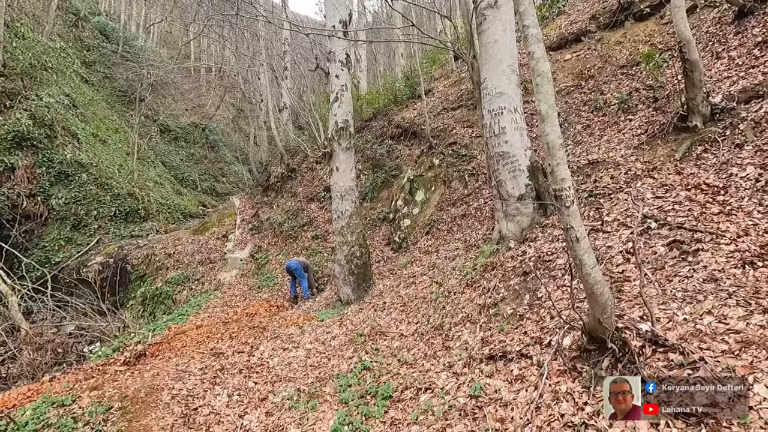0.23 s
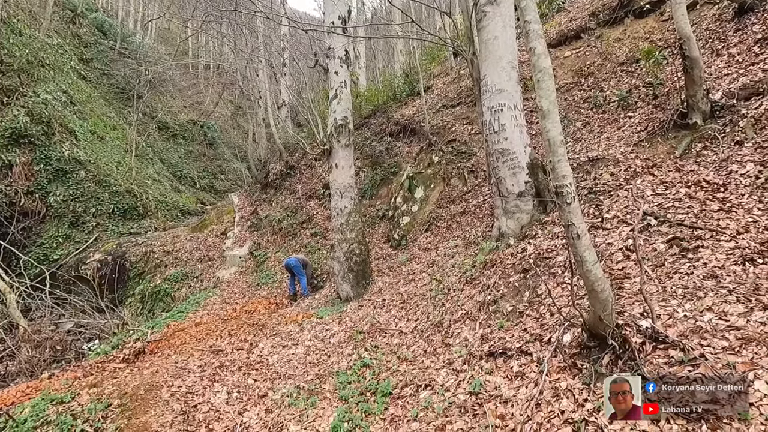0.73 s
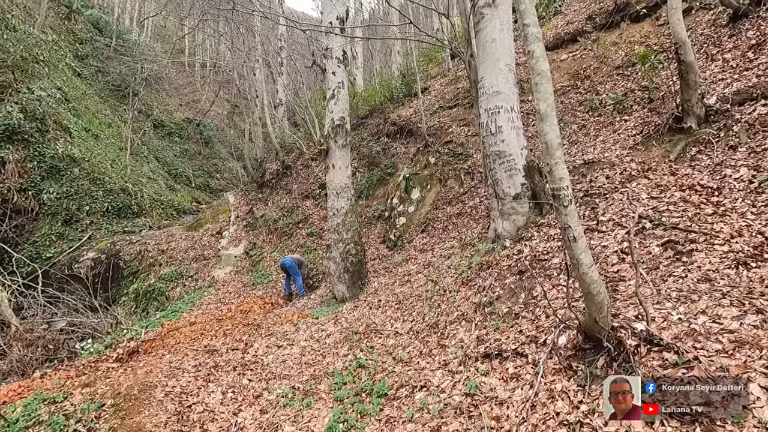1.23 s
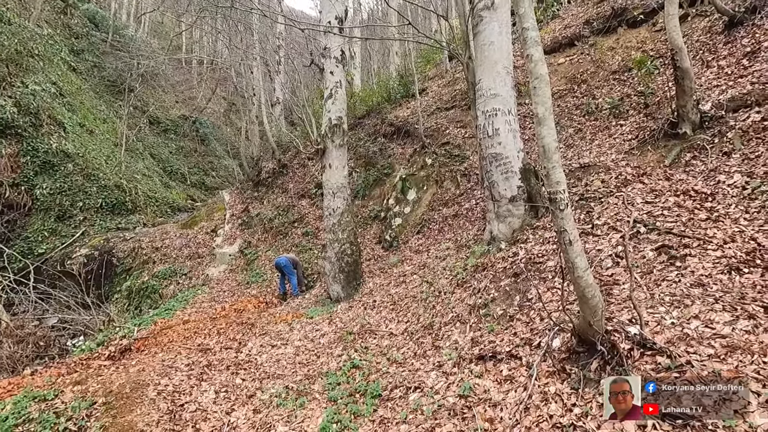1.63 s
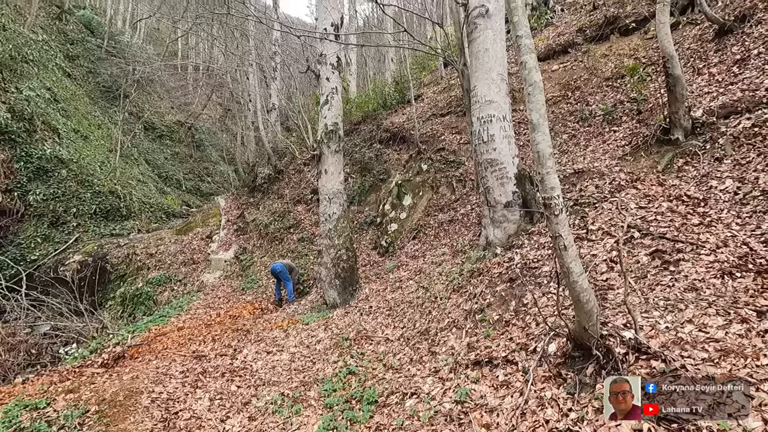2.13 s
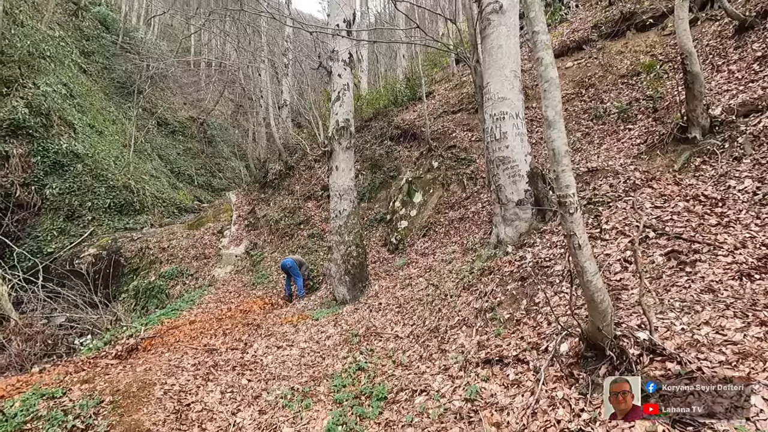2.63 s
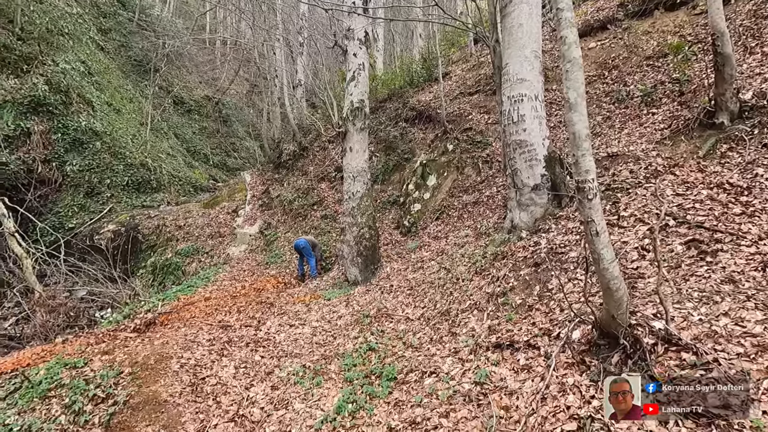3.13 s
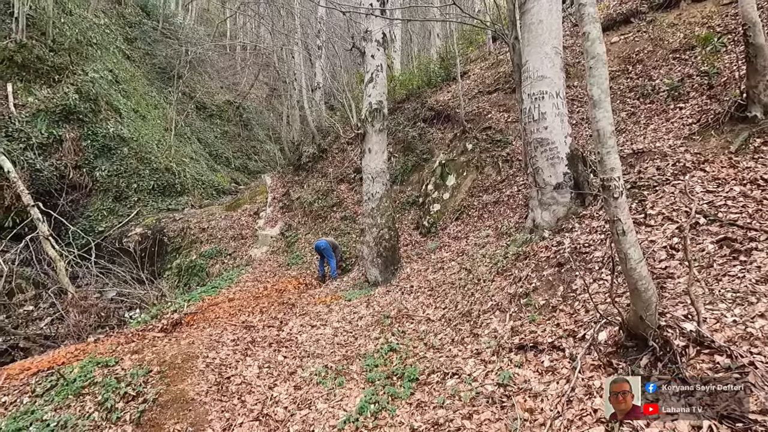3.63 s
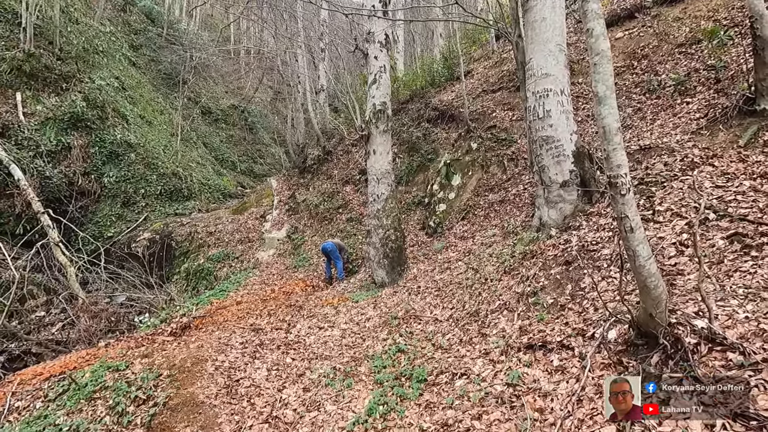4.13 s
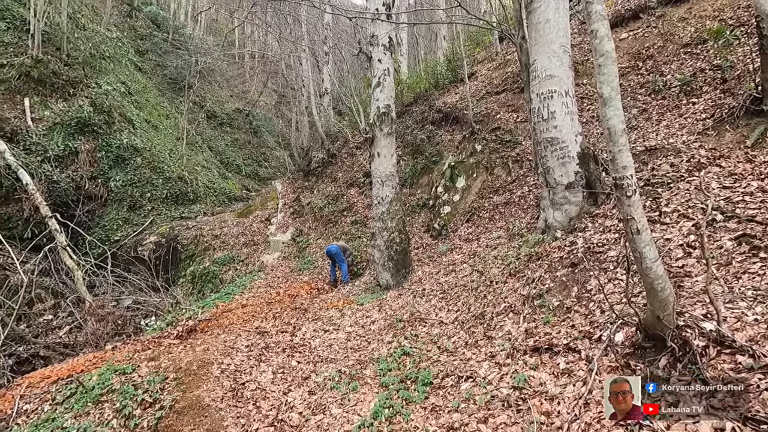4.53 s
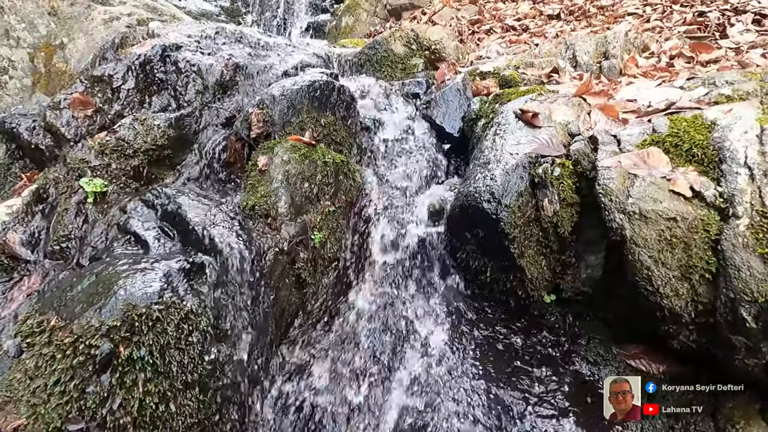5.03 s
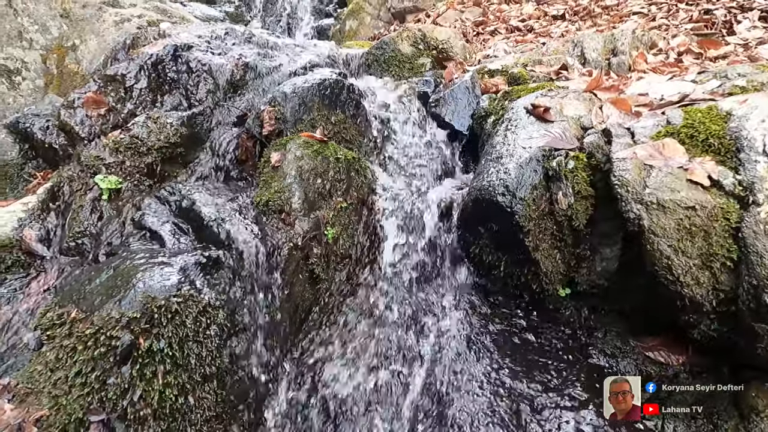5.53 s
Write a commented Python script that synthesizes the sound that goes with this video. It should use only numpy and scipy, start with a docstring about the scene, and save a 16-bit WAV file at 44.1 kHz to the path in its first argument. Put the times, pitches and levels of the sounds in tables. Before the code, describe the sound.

A quiet wooded ravine opens the sound: a stream purls softly some distance away, a steady wash with faint bubbling. Wind brushes the microphone in low, uneven puffs and rushes, strongest from about 1.2 to 3.2 seconds, with a little airy hiss near 1.5 and 2.3-2.8. Twigs crack at about 0.1, 0.4, 1.7, 2.8, 3.1 and 3.3 seconds, with a slight woodland echo; dry leaves tick faintly, mostly after 2. A bird gives thin, gliding high whistles between 2.6 and 3.1. The loudest, sharpest twig snap comes at 4.5. At about 4.87 the ravine cuts off, leaving roughly 0.2 seconds of silence. From 5.06 a small cascade fades in quickly, close and far louder: dense splashing, bubbles and bright spray surge over rocks, with low churning, hollow gulps and sharp water slaps, strongest around 5.2 and 5.6, continuing to the end. Both channels are identical.

```python
"""A wooded ravine: a stream purls some way off, wind brushes the microphone, twigs crack, leaves tick, a bird calls.
The sound cuts out, then fades in beside a small cascade: splashes, bubbles, slaps, hollow gulps between rocks.
Water is summed ringing bubbles plus noise; wind is shaped noise under gust envelopes; twigs are decaying modes;
leaves and slaps are noise bursts; bird notes and gulps are gliding sines. Both channels are alike."""
import sys
import numpy as np
from scipy import signal
from scipy.fft import rfft, irfft, next_fast_len
from scipy.io import wavfile
from scipy.ndimage import map_coordinates

SR = 44100
rng = np.random.default_rng(int(sys.argv[2]) if len(sys.argv) > 2 else 0)


def master_out(mix):
    """Clip the mix to full scale and print it as 16-bit PCM to the path in sys.argv[1]."""
    frames = np.transpose(np.atleast_2d(mix))
    ceiling = np.clip(frames, -1, 1)
    pcm = np.round(ceiling * 32767).astype(np.int16)
    wavfile.write(sys.argv[1], SR, pcm)


N = 254456

CUT_S, FADE_START_S, FADE_END_S = 4.868, 5.063, 5.135


def amp(db):
    """Decibels to gain."""
    return 10 ** (np.asarray(db) / 20)


def unit(x):
    """Scale x to rms 1."""
    return x / np.sqrt(np.mean(x ** 2) + 1e-20)


def clock():
    """Time of each sample, s."""
    return np.arange(N) / SR


def curve(rows):
    """Interpolate (t/s, value) rows to one value per sample."""
    t_s, value = np.transpose(rows)
    return np.interp(clock(), t_s, value)


def wobble(rate_hz):
    """Smooth random curve with rate_hz knots a second."""
    knots = rng.standard_normal(int(N * rate_hz / SR) + 4)
    return map_coordinates(knots, [clock() * rate_hz])


def envelope(top_s, attack_s, hold_s, release_s):
    """Gain that swells to 1 at top_s, holds, then dies away."""
    t = clock()
    swell = 1 + (t - top_s) / attack_s
    decay = 1 - (t - top_s - hold_s) / release_s
    return np.clip(np.minimum(swell, decay), 0, 1) ** 1.5


def filtered(x, response):
    """Apply a frequency response to x, zero-padded."""
    size = next_fast_len(N + SR // 2)
    spectrum = rfft(x, size) * response(np.fft.rfftfreq(size, 1 / SR))
    return irfft(spectrum, size)[..., :N]


def colour_gain(hz, colour):
    """Gain of an (f/Hz, level/dB) colour, interpolated over log frequency."""
    f_hz, level_db = np.transpose(colour)
    return amp(np.interp(np.log(hz + 1), np.log(f_hz), level_db))


def shaped(x, colour):
    """Filter x by a colour."""
    return filtered(x, lambda hz: colour_gain(hz, colour))


def noise(colour):
    """Gaussian noise of that colour, rms 1."""
    return unit(shaped(rng.standard_normal(N), colour))


def add(track, start_s, sound):
    """Mix a short sound into the track."""
    part = track[round(start_s * SR):][:len(sound)]
    part += sound[:len(part)]


def bubbles(from_s, rate_hz, low_hz, high_hz, cycles, spread_db, rise, size):
    """Bubbles ring as decaying sines, rising in pitch as they surface; rms 1 from from_s on."""
    span_s = N / SR - from_s
    start, pitch, life, strength, sign = rng.random((int(rate_hz * span_s), 5)).T[:, :, None]
    hz = low_hz * (high_hz / low_hz) ** pitch
    tau_s = cycles * (.5 + life) / hz / np.pi
    t = np.arange(size) / SR
    # gain in proportion to hz evens out the summed spectrum
    gain = amp(-spread_db * np.log(strength + .01)) * hz * np.sign(sign - .5)
    glide = 1 + rise * t / (t + 4 * tau_s)
    decay = np.exp(-t / tau_s) * (1 - np.exp(-2 * hz * t))
    ring = gain * decay * np.sin(2 * np.pi * hz * glide * t)
    at = ((from_s + start * span_s) * SR).astype(int) + np.arange(size)
    mix = np.bincount(at.ravel(), ring.ravel(), N)[:N]
    return unit(mix) * np.sqrt(span_s * SR / N)


def bursts(rows, t60_s, colour):
    """Short decaying noise bursts of one colour, each at its own peak level."""
    out, t = np.zeros(N), np.arange(SR // 20) / SR
    gain = colour_gain(np.fft.rfftfreq(len(t), 1 / SR), colour)
    lead_s = .001  # room ahead of the onset for the filter's spread
    for start_s, peak_db in rows:
        puff = rng.standard_normal(len(t)) * amp(-60 * t / t60_s) * (1 - np.exp(-2000 * t))
        burst = irfft(rfft(np.roll(puff, SR // 1000)) * gain)
        add(out, start_s - lead_s, amp(peak_db) * burst / np.abs(burst).max())
    return out


# stream spectrum: f/Hz, relative level/dB
BROOK_COLOUR_HZ_DB = [(180, -33.5), (300, -4.5), (387, -6), (462, -8), (577, -3.5), (733, -12.5), (860, -8),
                      (947, -12.5), (2280, -10), (3730, -12.5), (5740, -18.5), (7070, -26.5), (8980, -41.5),
                      (10900, -38.5), (13600, -68)]
BROOK_DB = -40


def brook():
    """Far water: distance blends most bubbles into a wash of noise, a few still stand out."""
    purl = bubbles(from_s=0, rate_hz=600, low_hz=583.6, high_hz=4050, cycles=18, spread_db=3.5, rise=0.027, size=900)
    water = unit(shaped(amp(-12.5) * purl + rng.standard_normal(N), BROOK_COLOUR_HZ_DB))
    return amp(BROOK_DB + 0.14 * wobble(11)) * water


# wind spectra, rumble, rush, bright rush, two hiss bands: f/Hz, relative level/dB
BUFFET_COLOUR_HZ_DB = [(25, -40.5), (50, -41), (80, -17.5), (120, -9), (160, -14.5), (260, -17.5),
                       (600, -69)]
RUSH_COLOUR_HZ_DB = [(80, -51), (150, -7), (205, -1), (258, 4.5), (300, -3.5), (350, -7), (480, -10.5),
                     (800, -24.5), (2000, -57.5)]
BRIGHT_COLOUR_HZ_DB = [(150, -25.5), (260, -3.5), (335, 7.5), (450, -6), (700, -15.5), (1500, -49.5)]
HISS_LOWER_HZ_DB = [(3000, -33.5), (4700, -1.5), (6500, -7.5), (7300, -1), (8000, -16.5), (10000, -31)]
HISS_UPPER_HZ_DB = [(7000, -18.5), (9500, -6), (10700, 0), (11900, -12), (12900, -18), (13800, -21)]
# strength of the rushing air, before trim: t/s, level/dB
BREEZE_S_DB = [(0.0, -38.5), (0.85, -35.5), (0.97, -39.5), (1.51, -33.5), (1.71, -47), (2.01, -37),
               (2.04, -42.5), (2.11, -37.5), (2.17, -45), (2.36, -32.5), (2.43, -34.5), (2.82, -30),
               (2.86, -37.5), (3.04, -35), (3.07, -30.5), (3.21, -41), (3.78, -40.5), (4.85, -40.5)]
# puffs buffeting the microphone, before trim: t at the top/s, hold/s, level/dB
PUFFS_S_S_DB = [(.34, 0.22, -52), (.70, 0.19, -47), (1.19, 0.094, -42.5), (1.58, 0.041, -52),
                (1.91, 0.062, -42), (2.36, 0.027, -49.5), (2.53, .2, -43), (2.8, 0.19, -48.5),
                (3.2, .08, -52), (3.46, 0.086, -45), (3.7, 0.12, -41), (3.92, 0.52, -47.5)]
# hiss in the two strongest gusts: t at the top/s, attack/s, hold/s, release/s, lower level/dB, upper level/dB
HISSES_S_DB = [(1.5, 0.66, 0.078, 0.079, -46.5, -59), (2.29, .04, 0.44, 0.59, -57.5, -61)]
PUFF_ATTACK_S, PUFF_RELEASE_S = 0.098, 0.17
LULL_DB = -60.5  # buffeting floor, before trim
BRIGHT_FROM_DB, BRIGHT_RANGE_DB = -42.5, 6.5  # the bright rush grows in over this range


def wind():
    """Air rushes past the microphone, puffs rumble on it, the strongest gusts hiss; all shaped noise."""
    rush_db = curve(BREEZE_S_DB)
    eddies = wobble(25.0)

    puffs = amp(LULL_DB)
    for top_s, hold_s, level_db in PUFFS_S_S_DB:
        puffs = puffs + amp(level_db) * envelope(top_s, PUFF_ATTACK_S, hold_s, PUFF_RELEASE_S)
    buffet = puffs * amp(-0.5 + 0.66 * eddies) * noise(BUFFET_COLOUR_HZ_DB)

    brightness = np.clip((rush_db - BRIGHT_FROM_DB) / BRIGHT_RANGE_DB, 0, 1)
    air = noise(RUSH_COLOUR_HZ_DB) + amp(-4.5) * brightness * noise(BRIGHT_COLOUR_HZ_DB)
    rush = amp(rush_db - 1.5 + 1.0 * eddies) * air

    lower, upper = noise(HISS_LOWER_HZ_DB), noise(HISS_UPPER_HZ_DB)
    hiss = np.zeros(N)
    for top_s, attack_s, hold_s, release_s, lower_db, upper_db in HISSES_S_DB:
        bands = amp(lower_db) * lower + amp(upper_db) * upper
        hiss += envelope(top_s, attack_s, hold_s, release_s) * bands
    return buffet + rush + hiss


# twigs cracking: t/s, peak level/dB, pitch factor on the modes/1
TWIGS_S_DB = [(0.075, -26.5, 1.55), (0.379, -29.5, 1.03), (1.735, -31, 1.3), (2.821, -30.5, 1.1),
              (3.115, -28, 0.514), (3.332, -29, 1.25), (4.4849, -16, 1.05)]
# wood modes: f/Hz, relative level/dB, t60/s
WOOD_HZ_DB_S = [(1280, -7, 0.03), (1730, 1.5, 0.024), (2090, -4, 0.018), (2930, 0, 0.017),
                (3090, -11.5, 0.021)]


def twigs():
    """A crack rings the wood's modes briefly; thinner twigs ring higher."""
    out, t = np.zeros(N), np.arange(SR // 10) / SR
    for start_s, peak_db, pitch in TWIGS_S_DB:
        ring = np.zeros(len(t))
        for hz, level_db, t60_s in WOOD_HZ_DB_S:
            ring += amp(level_db - 60 * t / t60_s) * np.sin(2 * np.pi * hz * pitch * t)
        ring *= 1 - np.exp(-t / 0.0004)
        add(out, start_s, amp(peak_db) * ring / np.abs(ring).max())
    return out


def echo(x):
    """Trunks and slopes scatter a short tail: convolution with decaying noise."""
    t = np.arange(SR // 2) / SR
    tail = rng.standard_normal(len(t)) * amp(-60 * t / .4)  # t60 0.4 s
    return signal.fftconvolve(x, tail / np.linalg.norm(tail))[:N]


# dry leaves ticking: t/s, peak level/dB
TICKS_S_DB = [(0.4873, -52), (2.0028, -44), (2.161, -46), (2.2134, -41), (3.6242, -50), (3.8646, -39),
              (4.2168, -43.5)]


def leaves():
    """Dry leaves tick: short bright noise bursts."""
    colour = [(2000, -24), (6000, 10), (7500, 5.0), (11000, -2), (14000, -7)]  # f/Hz, level/dB
    return bursts(TICKS_S_DB, t60_s=.025, colour=colour)


# bird notes, before trim: t/s, hold/s, start f/Hz, target f/Hz, glide time constant/s, level/dB
NOTES_S_HZ_DB = [(2.562, 0.038, 4650, 4370, .01, -45), (2.602, .018, 4450, 4650, .02, -42),
                 (2.737, .15, 6540, 4043, .012, -42.5), (3.0, 0.084, 4270, 5010, .09, -38.5),
                 (3.045, .004, 4950, 5500, .004, -35.5)]
NOTE_EDGE_S = .006  # swell and fade


def bird():
    """Thin sine whistles glide toward a target pitch, ever more slowly, and waver slightly."""
    song = np.zeros(N)
    for top_s, hold_s, from_hz, to_hz, glide_s, level_db in NOTES_S_HZ_DB:
        hz = to_hz + (from_hz - to_hz) * np.exp(-np.maximum(clock() - top_s, 0) / glide_s)
        gain = envelope(top_s, NOTE_EDGE_S, hold_s, NOTE_EDGE_S) * amp(level_db + 1.5 * wobble(60))
        phase = 2 * np.pi * np.cumsum(hz * (1 + 0.003 * wobble(150))) / SR
        song += gain * np.sin(phase)
    return amp(-1.5) * song


def spray(rate_hz, life_s, spread_db):
    """Drops burst on stone: brief decaying puffs of noise of uneven size, rms 1."""
    when, strength = rng.random((int(rate_hz * N / SR), 2)).T
    drop_power = amp(-spread_db * np.log(strength + .01)) ** 2
    hits = np.bincount((when * N).astype(int), drop_power, N)
    power = signal.lfilter([1], [1, -np.exp(-2 / (life_s * SR))], hits)
    return unit(np.sqrt(power) * rng.standard_normal(N))


# hollows between the rocks: f/Hz, width/Hz, level/dB
HOLLOWS_HZ_HZ_DB = [(550, 92, -11.5), (1055, 29, -10), (1840, 73, -5)]


def hollows(f_hz):
    """Resonant air spaces: band-pass peaks added to the direct sound."""
    response = 1
    for hz, width_hz, level_db in HOLLOWS_HZ_HZ_DB:
        damping = 1j * f_hz * width_hz
        response = response + amp(level_db) * damping / (hz * hz - f_hz * f_hz + damping)
    return response


# cascade spectrum: f/Hz, relative level/dB
FALL_COLOUR_HZ_DB = [(140, -53), (240, -20), (252, -29), (304, -7.5), (348, -8.5), (531, -0.5), (640, -6.5),
                     (1060, -2.5), (1260, -4), (2350, -2.5), (4480, -9), (5770, -18), (8960, -40),
                     (10800, -35), (13700, -56)]
# surges over the rocks, before trim: t/s, level/dB
FLOW_S_DB = [(5.14, -20.5), (5.146, -21.5), (5.222, -17.5), (5.238, -21.5), (5.264, -19), (5.704, -18),
             (5.71, -21), (5.724, -16.5), (5.765, -18)]
SPRAY_DB, FIZZ_DB, GURGLE_DB = 8.5, 6.5, -4.5  # re babble, before the filters


def falling_water():
    """Bubbles of three sizes and fine spray come in quick surges and ring in the hollows."""
    gurgle = bubbles(FADE_START_S, rate_hz=130, low_hz=326, high_hz=1328, cycles=11.5, spread_db=1.5,
                     rise=0.041, size=2200)
    babble = bubbles(FADE_START_S, rate_hz=1800, low_hz=295.0, high_hz=2970, cycles=14.2, spread_db=0.5,
                     rise=0.07, size=800)
    fizz = bubbles(FADE_START_S, rate_hz=2600, low_hz=2973, high_hz=12270, cycles=21, spread_db=1.5,
                   rise=.06, size=300)
    splash = spray(rate_hz=1500, life_s=0.0026, spread_db=1.5)
    mix = amp(GURGLE_DB) * gurgle + babble + amp(FIZZ_DB) * fizz + amp(SPRAY_DB) * splash
    surge = amp(.6 * wobble(60))
    water = shaped(filtered(surge * mix, hollows), FALL_COLOUR_HZ_DB)
    level = water[clock() > FADE_END_S].std()
    return amp(curve(FLOW_S_DB) + 0.37) * water / level


# low churn spectrum: f/Hz, relative level/dB
CHURN_COLOUR_HZ_DB = [(30, -42), (70, -28), (115, -15.5), (160, -1.5), (200, -2.5), (260, -7.5), (500, -21),
                      (1500, -81)]


def churn():
    """Low rumble of the churning water: shaped noise, wavering in level."""
    return amp(-40.5 + 1.1 * wobble(25)) * noise(CHURN_COLOUR_HZ_DB)


# big air pockets pulled under: t/s, start f/Hz, peak level/dB
GULPS_S_HZ_DB = [(5.127, 166, -38), (5.272, 149.5, -33), (5.342, 184, -31.5), (5.36, 148, -33),
                 (5.417, 143, -36), (5.478, 154, -26), (5.551, 156, -34), (5.652, 163, -28),
                 (5.69, 173, -29)]


def gulps():
    """Large air pockets swell and boom in the plunge pool as sines rising in pitch."""
    out, t = np.zeros(N), np.arange(SR // 6) / SR
    swell = (t / .017) ** 2 * np.exp(2 - 2 * t / .017)  # peaks at 17 ms
    for start_s, hz, peak_db in GULPS_S_HZ_DB:
        add(out, start_s, amp(peak_db) * swell * np.sin(2 * np.pi * hz * t * (1 + t)))
    return out


# water slapping rock: t/s, peak level/dB
SLAPS_S_DB = [(5.22, -10), (5.397, -15), (5.54, -15.5), (5.56, -15.5), (5.622, -9.5), (5.64, -7),
              (5.727, -13)]


def slaps():
    """Water slaps rock sharply: noise bursts in the cascade's colour."""
    return bursts(SLAPS_S_DB, t60_s=0.01, colour=FALL_COLOUR_HZ_DB)


def cascade():
    """Water tumbles over rocks: fall, churn, gulps and slaps summed."""
    return falling_water() + churn() + gulps() + slaps()


def scene():
    """The ravine, a moment of silence, then the cascade."""
    cracks, song = twigs(), bird()
    scattered = echo(amp(-9.5) * cracks + amp(-3.5) * song)
    ravine = brook() + wind() + cracks + scattered + leaves() + song
    fade_out = np.clip((CUT_S - clock()) / .012, 0, 1)
    fade_in = np.clip((clock() - FADE_START_S) / (FADE_END_S - FADE_START_S), 0, 1) ** 2
    mono = fade_out * ravine + fade_in * cascade()
    return np.array([mono, mono])


NOTCH_HZ, NOTCH_WIDTH_HZ, TOP_HZ = 9050, 450, 13850


def record(dry):
    """The microphone has a narrow notch in the treble and a steep band limit."""
    def response(hz):
        """Notch times low-pass."""
        offset_hz = hz - NOTCH_HZ
        notch = np.abs(offset_hz) / np.hypot(offset_hz, NOTCH_WIDTH_HZ)
        return notch * (hz < TOP_HZ)
    return filtered(dry, response)


dry = scene()
out = record(dry)
master_out(out)
```